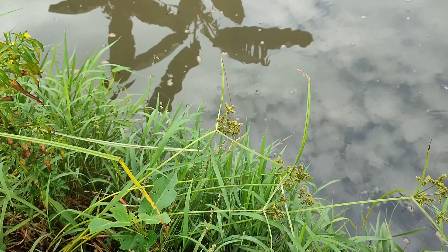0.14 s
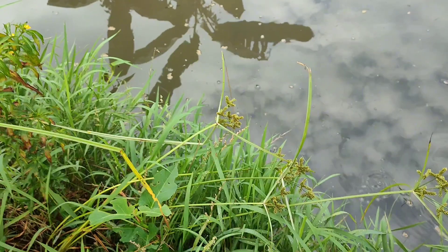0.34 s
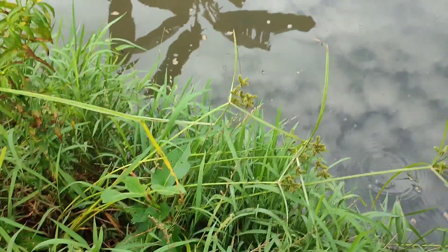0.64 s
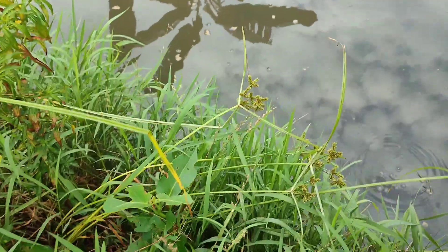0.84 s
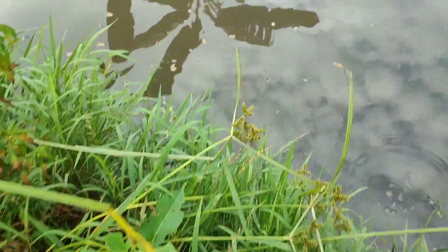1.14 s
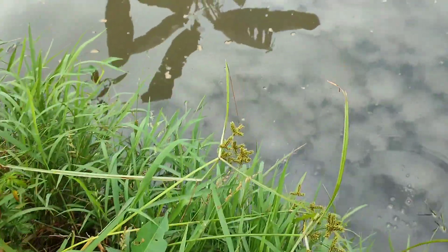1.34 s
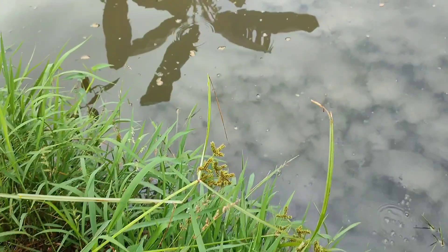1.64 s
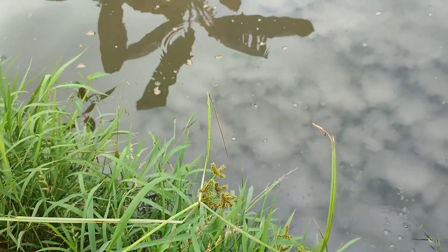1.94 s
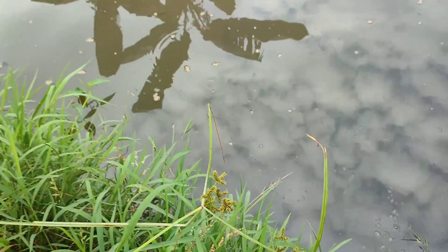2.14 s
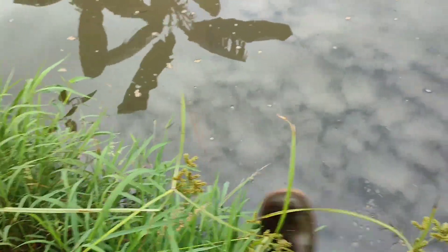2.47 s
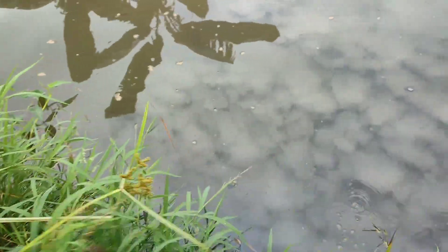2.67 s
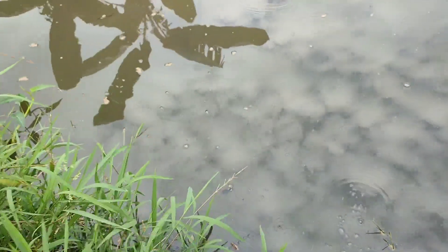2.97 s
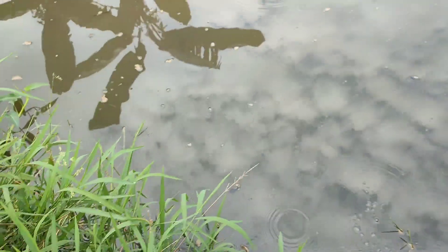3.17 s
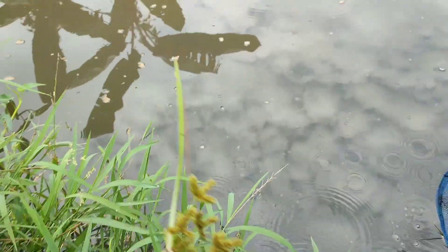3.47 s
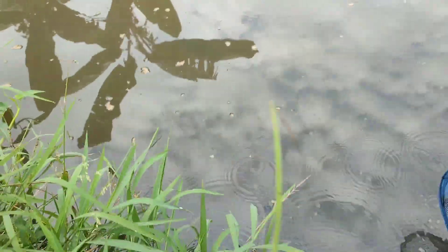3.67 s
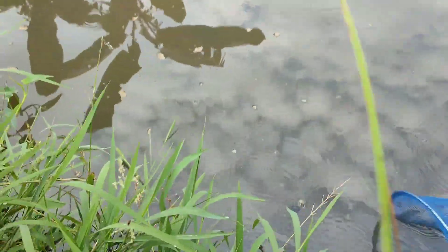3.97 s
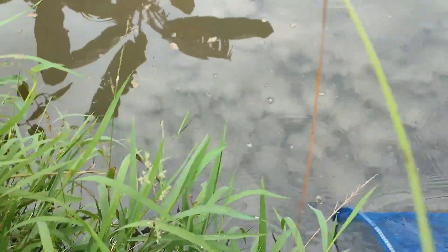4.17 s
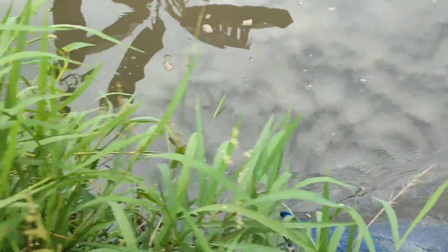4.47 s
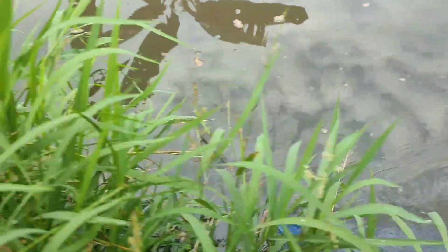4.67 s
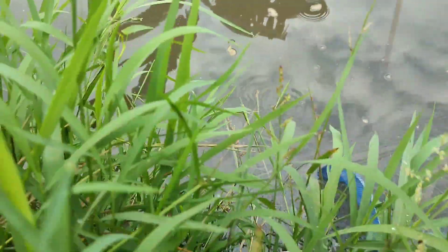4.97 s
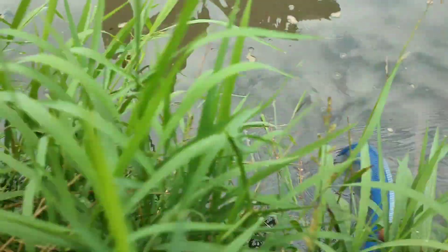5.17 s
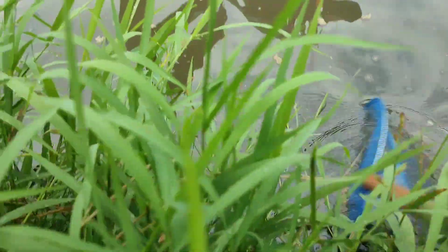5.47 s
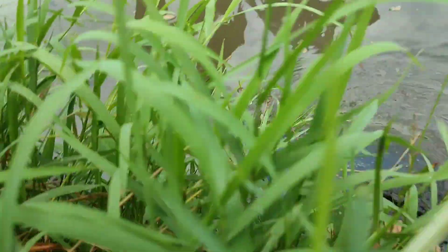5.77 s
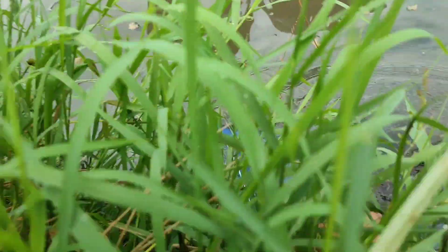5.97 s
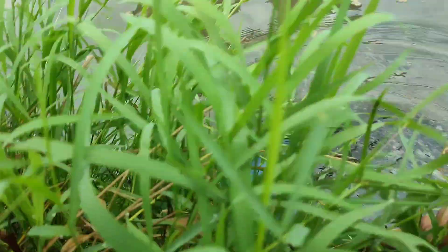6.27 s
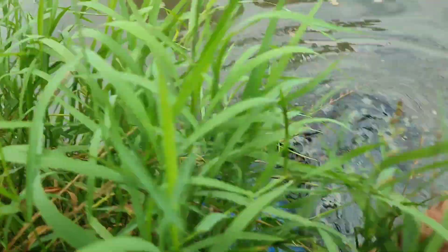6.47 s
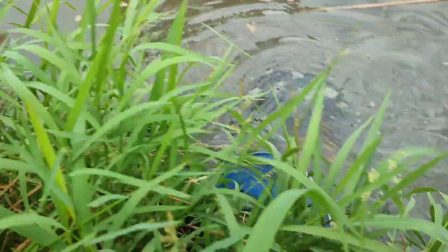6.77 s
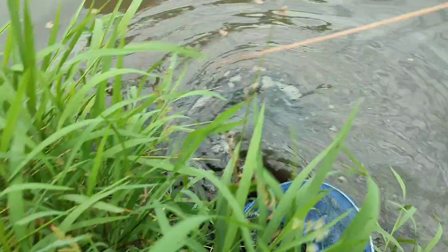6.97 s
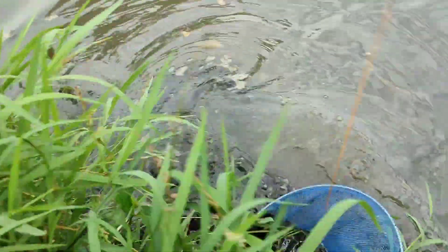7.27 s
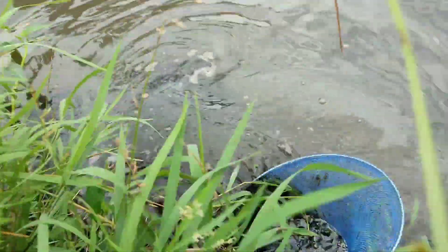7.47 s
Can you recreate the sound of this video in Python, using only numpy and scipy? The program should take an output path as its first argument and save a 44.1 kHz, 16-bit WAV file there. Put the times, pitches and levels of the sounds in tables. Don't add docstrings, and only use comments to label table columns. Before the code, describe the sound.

Outdoors at a pond edge, far insects ring in a thin high chorus while a cricket rasps rapidly on the right from one second. Birds whistle with echoes from trees, and a small engine putters past, gone after four seconds. Grass blades crackle and snap near the microphone. Later a net pushes through water with gurgles, plops and drips, and a gust buffets the right side.

```python
import sys
import numpy as np
from scipy import signal
from scipy.fft import rfft, irfft, next_fast_len
from scipy.io import wavfile
from scipy.ndimage import uniform_filter1d

SR = 44100
rng = np.random.default_rng(int(sys.argv[2]) if len(sys.argv) > 2 else 0)


def transcribe(u):
    v = np.clip(np.atleast_2d(u).T, -1, 1)
    q = np.round(v * 32767).astype(np.int16)
    wavfile.write(sys.argv[1], SR, q)


def nominal_scale(level):
    x = np.asarray(level, float) / 20
    return 10 ** x


N = 336042
TIME = np.arange(N) / SR
LEAD_S = 0.00026


def evened(x):
    return x / np.sqrt(np.mean(x ** 2) + 1e-20)


def follow(rows):
    s, *columns = np.transpose(rows)
    since_start = TIME - s[0] + (s[0] < .01)
    until_end = s[-1] - TIME + (s[-1] > TIME[-1] - .01)
    fade = np.clip(np.minimum(since_start, until_end) / .03, 0, 1)
    return [fade] + [np.interp(TIME, s, c) for c in columns]


def read(points, hz):
    f, value = np.transpose(points)
    return np.interp(np.log(hz + 1), np.log(f + 1), value)


def panned(x, pan_db):
    left = nominal_scale(pan_db) * np.ones(1)
    return x * np.array([left, left * 0 + 1]) * np.sqrt(2 / (1 + left ** 2))


def add(mix, s, sound):
    part = mix[:, round(s * SR):][:, :sound.shape[1]]
    part += sound[:, :part.shape[1]]


def coloured(x, points):
    size = next_fast_len(N)
    gain = nominal_scale(read(points, np.fft.rfftfreq(size, 1 / SR)))
    return evened(irfft(rfft(x, size) * gain, size)[..., :N])


def band(lo_hz, hi_hz, slope_db):
    return [(lo_hz / 8, -3 * slope_db), (lo_hz, 0), (hi_hz, 0), (hi_hz * 8, -3 * slope_db)]


def airborne(same):
    size = next_fast_len(N)
    hz = np.fft.rfftfreq(size, 1 / SR)
    a, b = rfft(rng.standard_normal((2, size)))
    same = np.clip(read(same, hz), -1, 1)
    late = np.exp(-2j * np.pi * hz * LEAD_S)
    right = same * a * late + np.sqrt(1 - same ** 2) * b
    return irfft(np.array([a, right]), size)[:, :N]


def crackle(count, spread_db, same=0):
    place, size, sign = rng.random((3, 2, count))
    size = nominal_scale(spread_db * np.minimum(-np.log(size + 1e-9), 5)) * np.sign(sign - .5)
    left, right = (np.bincount((p * N).astype(int), s, N) for p, s in zip(place, size))
    same = np.clip(same, 0, 1)
    return evened(np.array([left, same * left + np.sqrt(1 - same ** 2) * right]))


def wander(per_s):
    count = int(TIME[-1] * per_s) + 3
    return np.interp(TIME * per_s, np.arange(count), rng.standard_normal(400)[:count])


def ring(hz, cycles, glide):
    u = np.arange(int(5 * cycles * SR / hz)) * hz / SR
    attack = np.sin(np.pi / 2 * np.minimum(u / 1.55, 1)) ** 2
    return np.sin(2 * np.pi * u * (1 + glide * u)) * np.exp(-u / cycles) * attack


def swell(start, length, rise, fall):
    u = (TIME - start) / length
    return np.sin(np.pi / 2 * np.clip(np.minimum(u / rise, (1 - u) / fall), 0, 1)) ** 2


def chorus():
    # t/s, level/dB, left minus right/dB
    low_curve = [(0, -55, -4), (.87, -55, -2), (1.15, -52.5, -34), (4, -53, -49), (7.62, -53.5, -29)]
    high_curve = [(0, -59.5, 2.1), (.95, -59, 3.7), (1.05, -62.5, 5.6), (4, -64, 0.79), (7.62, -63, 4.1)]
    low_colour = [(5600, -68), (6300, -14.0), (6600, -6.5), (7100, -1.5), (7300, -9.5),
                  (7600, -15.0), (8400, -70)]
    high_colour = [(7400, -12.5), (8400, -4.5), (9000, 3.5), (9500, -3.5), (10400, -26), (12000, -58)]
    _, low_db, low_pan_db = follow(low_curve)
    _, high_db, high_pan_db = follow(high_curve)
    low = coloured(crackle(count=40000, spread_db=0.5), low_colour)
    low *= nominal_scale(0.28 * wander(15.0) + 0.21 * np.sin(2 * np.pi * 58 * TIME))
    high = coloured(crackle(count=40000, spread_db=1.5), high_colour)
    return nominal_scale(low_db + 2.5) * panned(low, low_pan_db) + nominal_scale(high_db + 0.5) * panned(high, high_pan_db)


def engine():
    # t/s, f/Hz
    speed = [(0, 25), (.64, 24.9), (1.5, 26), (2.14, 26.5), (2.83, 27.4), (3.55, 27.9), (3.97, 24),
             (4.2, 23.5)]
    # t/s, level/dB, brightness/dB per multiple
    passing = [(0, -44.5, -1.5), (.5, -45, -0.8), (.85, -46, 1.17), (1.15, -46.5, 0.37), (1.5, -42, -0.57),
               (1.9, -42, -.5), (2.4, -44, -0.9), (2.9, -44, -2), (3.4, -49.5, -1), (3.9, -42.5, -2),
               (4.2, -50, -2)]
    # multiple of firing rate, level/dB
    exhaust = [(1, -23), (2, -9), (3, -14), (4, 0.5), (5, -2), (6, -6.5), (7, -9), (8, -16), (9, -12.5),
               (10, -16), (11, -22)]
    tyres_db, tyres_gone_s, tyres_fade_s = -59.5, 4.27, 1.4
    fade, db, bright_db = follow(passing)
    turns = np.cumsum(follow(speed)[1]) / SR + 0.012 * wander(9)
    pipe = 0
    for k, harmonic_db in exhaust:
        level = nominal_scale(harmonic_db + bright_db * (k - 3) + 2.03 * wander(2.48))
        pipe = pipe + level * np.cos(2 * np.pi * k * turns - 0.32 * k)
    at_ports = -np.array([pipe, np.roll(pipe, round(LEAD_S * SR))])
    leaving = np.clip((tyres_gone_s - TIME) / tyres_fade_s, 0, 1)
    tyres = coloured(airborne([(500, 1.0), (2000, 0.25)]), band(1036, 950, 21.0)) * nominal_scale(0.24 * wander(5.4))
    return panned(fade * nominal_scale(db) * evened(at_ports), -0.071) + leaving * nominal_scale(tyres_db) * tyres


def background():
    # t/s, level/dB
    rumble_swelling = [(0, 10.5), (1.5, 6.5), (3, 6), (4.2, -0.5), (5.9, -2), (6.9, 10), (7.62, -3)]
    # f/Hz, level/dB per Hz
    air_colour = [(90, -1.5), (180, 2.5), (300, -10.5), (1100, -14.5), (1500, -18), (2200, -14.5),
                  (3500, -24), (6000, -45)]
    # f/Hz, left-right likeness/1
    likeness = [(60, 0.97), (200, 0.96), (300, 0.81), (500, 0.89), (700, 0.036), (1100, 0.041),
                (2500, 0.042), (5000, 0.042)]
    rumble_db, lumps_db, deep_share, air_db = -48.5, 2.5, 0.16, -57
    deep_colour = [(12, -2), (30, -4.5), (55, 7.5), (80, 5.0), (110, 1.0), (200, -40.0)]
    upper_colour = [(60, -43), (110, 6), (200, -3.0), (350, -13.5), (700, -34.0), (1400, -40.5)]
    swelling_db = follow(rumble_swelling)[1]
    lumps = nominal_scale(rumble_db + lumps_db * wander(3.75))
    deep = nominal_scale(deep_share * swelling_db) * coloured(airborne(likeness), deep_colour)
    upper = nominal_scale(swelling_db - 8.5) * coloured(airborne(likeness), upper_colour)
    still_air = coloured(airborne(likeness), air_colour) * nominal_scale(2.2 * wander(5.2))
    return panned(lumps * (deep + upper), -0.67) + nominal_scale(air_db) * still_air


def grass():
    # start/s, length/s, level/dB, left minus right/dB
    strokes = [(-.06, 0.12, -59, 5), (0.46, 0.076, -71, -9), (.58, 0.45, -68.5, -5),
               (0.875, 0.27, -64, -13), (1.475, 0.17, -63, -2), (1.553, 0.46, -60.5, -7),
               (2.08, 0.67, -69.5, -3), (2.448, 0.5, -56.5, -0.5), (2.56, 0.71, -54.5, .5),
               (3.062, 0.36, -56, -1), (3.3, 0.24, -58, -1.5), (3.45, .25, -65, -3),
               (4.107, 0.28, -68, -19), (4.202, 1.9, -68, -11), (5.37, 0.64, -62, -5),
               (5.73, 0.73, -59, -6), (5.98, 0.51, -59.5, -4.5), (6.17, 0.49, -59.5, -6),
               (6.525, 0.28, -53.5, -6), (6.58, 1.08, -58.5, -6)]
    # f/Hz, level/dB per Hz
    blade_colour = [(1500, -8), (3000, -6), (5500, -6.5), (7000, -1.5), (9000, -3.5), (10800, -7.5),
                    (13000, -2), (16000, -6)]
    # t/s, level/dB
    scuff = [(0, -60.5), (.15, -61.5), (.35, -64), (.47, -75)]
    # t/s, peak/dB, part from 1.2 to 5 kHz/dB, left minus right/dB
    snaps = [(0.482, -41.5, -32, -24), (0.4883, -54, -41, -11), (0.9264, -54, -52, -4),
             (1.007, -55, -41, -5), (1.065, -51, -44, -13), (1.082, -53, -43, -15), (1.467, -52, -38, -17),
             (1.5247, -46, -62, -15), (1.787, -51, -61, 0), (4.108, -57, -46, -14), (3.931, -58, -52, -9),
             (4.118, -59, -48, -7), (5.443, -48, -50, -11), (4.661, -54, -45, -4), (4.175, -51, -57, -13),
             (4.1814, -66, -48, -8), (4.212, -53, -56, -33), (5.254, -47, -62, -16),
             (5.3034, -51, -62, -11), (5.4046, -48, -48, -12), (5.569, -48, -58, -6), (6.755, -45, -29, 0),
             (6.8175, -49, -46, -2), (6.875, -47, -52, 0), (6.632, -50, -45, 0), (6.855, -45, -37, 0),
             (7.009, -42, -35, 0), (7.273, -48, -46, 0), (6.5505, -46, -50, -1.5), (6.795, -46, -44, 4),
             (6.906, -52, -34, -4), (6.9835, -46, -45, -2.5), (7.0848, -47, -50, -7),
             (7.181, -54, -61, -2.5)]
    # t/s, peak/dB, f/Hz, left minus right/dB
    ping = (5.5068, -28, 7700, -6)
    rise, fall, stir_db = 0.26, 0.48, -74
    scuff_colour = [(400, -16), (700, -1), (1100, -18), (1500, -13), (1850, 3), (2250, -4),
                    (2700, 1), (4200, -24)]

    power = sum(panned(nominal_scale(db) * swell(s, length, rise, fall), pan_db) ** 2
                for s, length, db, pan_db in strokes)
    clumps = nominal_scale(1.2 * wander(45) + .4 * wander(9))
    level = nominal_scale(5.5) * np.sqrt(power + nominal_scale(stir_db) ** 2) * clumps
    out = level * coloured(crackle(count=70000, spread_db=2.5), blade_colour)

    fade, scuff_db = follow(scuff)
    out += fade * nominal_scale(scuff_db + 8.5) * coloured(crackle(count=30000, spread_db=3.5, same=0.16), scuff_colour)

    t = np.arange(256) / SR
    mid_band = signal.butter(2, [1200, 5000], "band", fs=SR)
    for (s, db, low_db, pan_db), grit in zip(snaps, rng.standard_normal((len(snaps), 256))):
        tick = grit * nominal_scale(-60 * t / 0.018)
        low = signal.lfilter(*mid_band, tick)
        add(out, s, panned(nominal_scale(db + 2) * (tick - low) + nominal_scale(low_db) * low, pan_db))

    s, db, hz, pan_db = ping
    add(out, s, panned(nominal_scale(db) * ring(hz, 5.0, 0), pan_db))
    return out


def whistle(rows):
    s, hz, db = np.transpose(rows)
    t = np.arange(s[0], s[-1], 1 / SR)
    glide = uniform_filter1d(np.interp(t, s, hz), 200, mode="nearest")
    tone = np.sin(2 * np.pi * np.cumsum(glide) / SR)
    return nominal_scale(np.interp(t, s, db) + 7.5) * tone * signal.windows.tukey(len(t), .15)


def birds():
    # t/s, f/Hz, level/dB
    notes = [
        [(1.86, 1650, -76), (1.93, 1760, -70), (1.965, 1950, -66), (1.985, 2080, -72)],
        [(2.089, 2400, -63), (2.1, 1850, -66), (2.113, 1750, -66), (2.126, 2280, -59), (2.142, 2600, -54),
         (2.158, 2670, -55), (2.172, 2630, -66)],
        [(2.305, 2950, -72), (2.316, 3020, -59), (2.329, 3130, -57), (2.34, 2950, -60), (2.36, 2580, -58),
         (2.395, 2340, -60), (2.43, 2270, -62), (2.47, 2250, -71)],
    ]
    # t/s, level/dB
    sung = [
        [(0.987, -2), (1.86, -1.5), (2.739, -2), (3.623, -2), (7.095, 5.5)],
        [(1.212, -2), (2.089, 0.5), (2.955, -1.5), (3.895, -2.5), (6.425, -2), (7.317, -3)],
        [(1.443, 0), (2.31, -0.5), (3.187, -1.5), (6.656, -1.5), (7.536, -1)],
    ]
    # start/s, length/s, first f/Hz, last f/Hz, level/dB
    far_whistles = [(0, .09, 4400, 4450, -80), (.225, .2, 4800, 4250, -78), (.64, .25, 4450, 4230, -74),
                    (3.71, .07, 3330, 3150, -66), (3.9, .08, 1036, 1190, -71), (3.99, .04, 3330, 3260, -70),
                    (4.045, .025, 3250, 3200, -72), (4.15, .19, 4170, 4260, -82),
                    (4.285, .035, 3150, 3230, -72)]
    settle, wane_db, broken_db = .3, -3, 3
    out = np.zeros((2, N))
    for note, times in zip(notes, sung):
        for s, db in times:
            add(out, s, panned(nominal_scale(db + 1.5) * whistle(note), -12))
    broken = nominal_scale(broken_db * wander(40))
    for s, length, first_hz, last_hz, db in far_whistles:
        tone = whistle([(s, first_hz, db),
                        (s + settle * length, last_hz - 30, db),
                        (s + length, last_hz, db + wane_db)])
        add(out, s, panned(tone * broken[round(s * SR):][:len(tone)], -1.9))

    t = np.arange(SR // 2) / SR
    sparse = rng.choice([-1., 1.], (2, len(t))) * (rng.random((2, len(t))) < .25)
    trees = sparse * nominal_scale(-60 * t / 0.8) * (t > .006)
    echoes = signal.fftconvolve(out.mean(0)[None], trees / np.linalg.norm(trees[0]), axes=1)[:, :N]
    return out + nominal_scale(-2.5) * panned(echoes, -5)


def water():
    # start/s, length/s, level/dB
    sweeps = [
        (5.325, 1, -63.5),
        (6, 1, -57),
        (6.588, 0.71, -51.5),
        (6.857, 0.52, -51.5),
        (7.087, 1, -54.5),
    ]
    # t/s, peak/dB, f/Hz, left minus right/dB
    drops = [(5.541, -37, 4370, -14), (5.554, -38.5, 2260, -13), (5.667, -43.5, 1010, 0.0),
             (5.76, -40, 1700, 9), (5.808, -40, 1330, -3), (6.426, -42, 930, -4), (6.627, -39, 1100, 4),
             (6.757, -19, 1240, 4), (6.796, -33, 1840, -0.5), (6.81, -40, 2110, -1.0),
             (6.837, -34, 1790, 2.5), (6.858, -27, 2310, 8), (6.865, -30, 2550, 3),
             (6.932, -33.5, 3780, -7), (6.949, -46, 1890, 0.0), (6.986, -34, 935, 2),
             (7.008, -36, 1680, 0.5), (7.052, -41, 1760, 0), (7.079, -38.5, 1040, 0),
             (7.118, -37.5, 3210, 2), (7.129, -33.5, 1010, -2), (7.14, -32.5, 910, 3), (7.199, -41, 920, 5),
             (7.222, -42, 2970, -2), (7.227, -43, 1500, 0), (6.984, -36, 2550, 0), (7.17, -39, 1180, 3),
             (6.9, -40, 1890, 0), (6.798, -43, 990, 2), (7.273, -37.5, 1950, -2.0), (7.289, -36.5, 980, 2)]
    # t/s, peak/dB, f/Hz
    drips = [(0.585, -47, 1070), (1.751, -46, 1000), (3.423, -45, 1040), (3.993, -45.5, 840),
             (4.118, -46, 2900), (4.183, -45.5, 1590), (4.248, -54, 895), (4.361, -45, 1100),
             (4.66, -53, 1000)]
    # t/s, peak/dB, f/Hz
    glugs = [(3.991, -42, 557), (5.756, -39.5, 570), (6.554, -41, 586), (6.725, -41, 350), (6.84, -29, 320),
             (6.892, -35, 308), (7.014, -29, 332), (7.03, -31.5, 420), (7.288, -41, 431), (7.478, -30, 351)]
    rise, fall = 0.19, 0.39
    gurgle_db, gurgle_share = -12.5, 0.77

    push = np.sqrt(sum((nominal_scale(db) * swell(s, length, rise, fall)) ** 2 for s, length, db in sweeps))
    gurgle = splash = 0
    for hz in np.geomspace(260, 680, 8):
        bubbles = crackle(count=500, spread_db=5.0, same=0.42)
        gurgle = gurgle + signal.oaconvolve(bubbles, ring(hz, 9.4, 0.01052)[None])[:, :N]
    for hz in np.geomspace(950, 4500, 14):
        bubbles = crackle(count=2200, spread_db=4.0, same=0.083)
        splash = splash + signal.oaconvolve(bubbles, ring(hz, 14.0, 0.01335)[None])[:, :N]
    out = nominal_scale(gurgle_db) * push ** gurgle_share * evened(gurgle) + push * evened(splash)

    for s, db, hz, pan_db in drops + [(*drip, 0) for drip in drips]:
        add(out, s, panned(nominal_scale(db + 3.0) * ring(hz, 2.8, .008), pan_db))
    for s, db, hz in glugs:
        add(out, s, panned(nominal_scale(db - 3.0) * ring(hz, 2.9, 0.0078), 0))
    return out


def cricket():
    # first chirp/s, chirps, period/s, slowing/s per chirp squared
    phrases = [
        (1.0102, 37, .06854, -3.7e-6),
        (3.6759, 58, .06812, 7.4e-6),
    ]
    # t/s, level/dB at the right port
    loudness = [(1, -43), (3.5, -42), (5.5, -43.5), (7.6, -43.5)]
    out = np.zeros((2, N))
    t = np.arange(round(0.033 * SR)) / SR
    stroke = signal.windows.tukey(len(t), .55) * nominal_scale(np.linspace(-1.5, .5, len(t)))
    for first, chirps, period, slowing in phrases:
        number = np.arange(chirps)
        centres = first + period * number + slowing * number ** 2
        for at, (late, db, off, turn) in zip(centres, rng.standard_normal((chirps, 4))):
            hz = 7295 + 8 * off - 105 * (t / t[-1]) ** 1.6
            tone = np.sin(2 * np.pi * np.cumsum(hz) / SR + 3 * turn)
            add(out, at - .0155 + .0011 * late, panned(nominal_scale(1.2 * db) * stroke * tone, -22))
    return out * nominal_scale(follow(loudness)[1])


def gust():
    # t/s, level/dB
    strength = [(7.25, -56), (7.268, -45), (7.312, -34), (7.434, -29), (7.458, -35), (7.62, -27.5)]
    # f/Hz, level/dB per Hz
    gust_colour = [(5.9, -28), (10, 12), (37, -10), (54, 8.5), (120, -9.5), (181, -8), (378, -25),
                   (900, -47.5)]
    # t/s, level/dB
    buffets = [(7.324, -18.5), (7.366, -19), (7.416, -15), (7.441, -29), (7.484, -17), (7.538, -32),
               (7.566, -20)]
    buffet_s = 0.0021
    fade, db = follow(strength)
    swing = fade * nominal_scale(db + 4.0) * coloured(rng.standard_normal(N), gust_colour)
    for s, drop_db in buffets:
        u = (TIME - s) / buffet_s
        swing -= nominal_scale(drop_db) * (np.exp(-u ** 2) - 0.21 * np.exp(-(u / 7.9) ** 2))
    return np.array([[.04], [1]]) * swing


def scene():
    return chorus() + engine() + background() + grass() + birds() + water() + cricket() + gust()


def top_cut(x):
    return signal.sosfilt(signal.butter(12, 15520, fs=SR, output="sos"), x)


def record(dry):
    return top_cut(dry)


dry = scene()
out = record(dry)
transcribe(out)
```